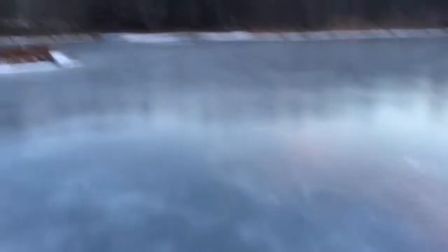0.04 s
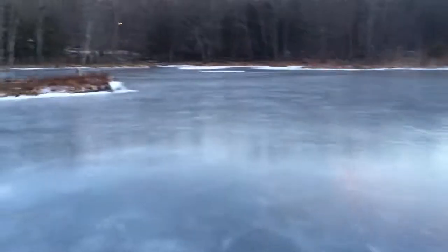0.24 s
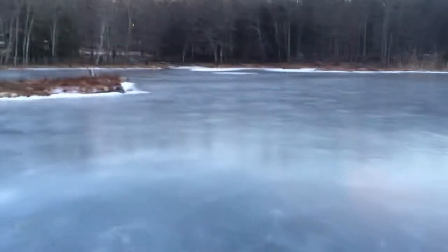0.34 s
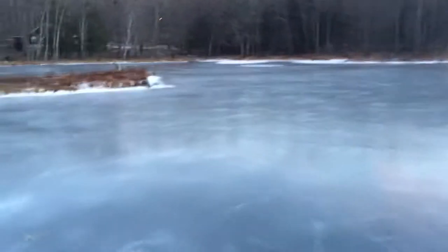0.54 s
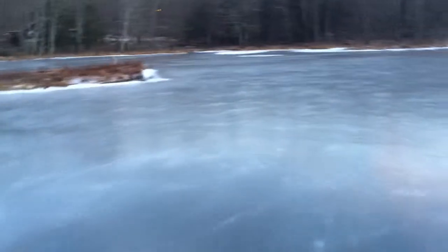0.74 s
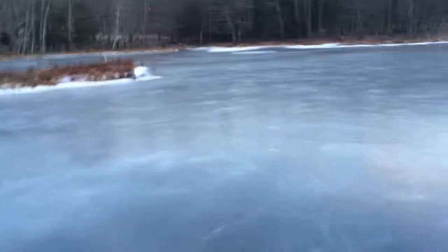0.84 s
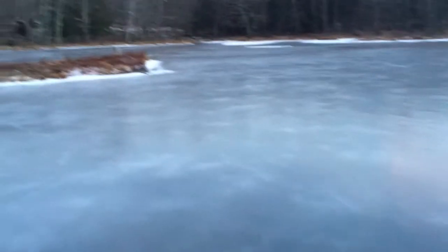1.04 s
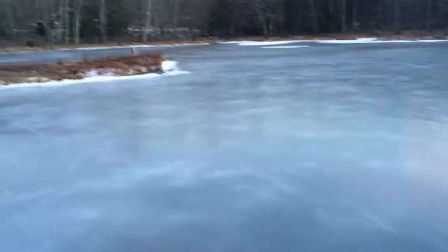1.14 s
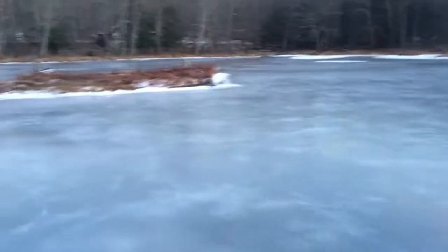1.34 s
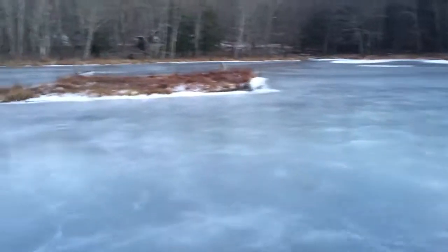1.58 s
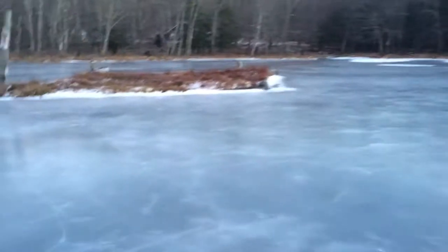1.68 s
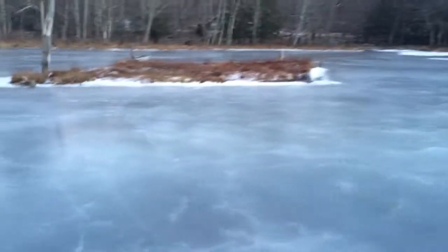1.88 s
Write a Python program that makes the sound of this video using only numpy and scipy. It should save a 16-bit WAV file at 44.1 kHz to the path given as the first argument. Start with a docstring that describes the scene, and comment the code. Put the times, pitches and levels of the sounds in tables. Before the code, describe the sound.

Ice skating on a frozen lake: a sharp crack, a steely blade touch and rasping push-off, then a louder cluster of cracks with a boot thud, then more crunches; close microphone, dry open air, no echo.

```python
"""Ice cracks under a skater on a frozen lake: each fracture is a filtered knock with splinters, ring and snap.
Faint fractures crackle all along. The blade's edge scrapes as crushed grains and hissing ice dust.
The blade sets down with a thin steel ring made of resonant noise, and a push-off rasps.
One step lands with a thud, a low damped knock. Open air, no echo, a faint low rumble of noise."""
import sys
import numpy as np
from scipy import signal
from scipy.fft import rfft, irfft, next_fast_len
from scipy.io import wavfile
from scipy.ndimage import uniform_filter1d, map_coordinates

SR = 44100
rng = np.random.default_rng(int(sys.argv[2]) if len(sys.argv) > 2 else 0)


def dump_mix(stems):
    """Bounce the given channels to the path in sys.argv[1] as a 16-bit WAV at rate SR."""
    frames = np.atleast_2d(stems).T  # one column per channel
    limited = np.clip(frames, -1, 1)  # hard clip at full scale
    pcm = np.round(limited * 32767).astype(np.int16)
    wavfile.write(sys.argv[1], SR, pcm)


N = 83790  # length in samples


def amp(db):
    """Turn decibels into a gain."""
    return 10 ** (np.asarray(db) / 20)


def unit(x):
    """Scale to an average (rms) level of 1."""
    return x / np.sqrt(np.mean(x ** 2) + 1e-20)


def gain(points, hz):
    """Gain at each frequency, from (Hz, dB) points joined on a log axis."""
    point_hz, point_db = np.transpose(points)
    return amp(np.interp(np.log(hz + 1), np.log(point_hz + 1), point_db))


def noise(points, size):
    """Noise of rms 1, coloured by (Hz, dB) points."""
    spectrum = rfft(rng.standard_normal(size))
    return unit(irfft(spectrum * gain(points, np.fft.rfftfreq(size, 1 / SR)), size))


def knock(points, shape=lambda hz: 1, size=4096):
    """A knock of peak 1 coloured by the points times shape(Hz), its energy as early as possible."""
    hz = np.fft.rfftfreq(size, 1 / SR)
    # Folding the cepstrum (the transform of the log spectrum) gives minimum phase
    cepstrum = irfft(np.log(gain(points, hz) * shape(hz)))
    cepstrum[1:size // 2] *= 2
    cepstrum[size // 2 + 1:] = 0
    response = irfft(np.exp(rfft(cepstrum)))
    return response / np.abs(response).max()


def fade(t, t60):
    """Exponential decay that loses 60 dB in t60 seconds."""
    return np.exp(-np.log(1000) * t / t60)


def wobble(rate):
    """A smooth random curve through `rate` random values a second."""
    return map_coordinates(rng.standard_normal(8192), [np.arange(N) * rate / SR], mode="wrap")


def add(track, s, sound):
    """Mix a sound into the track at s seconds."""
    part = track[max(0, round(s * SR)):][:len(sound)]
    part += sound[:len(part)]


def air():
    """Low rumble of moving air and gliding skates: dark noise with an uneven level."""
    # Colour of the rumble. Each row: frequency in Hz, level in dB.
    rumble_colour = [(20, -56), (35, -8.5), (60, -3), (110, -4), (170, 0), (300, -12), (700, -12),
                     (3000, -37), (15000, -60)]
    # Loudness of the rumble over time. Each row: time in seconds, level in dB.
    rumble_level = [(0, -59), (.2, -58.5), (.32, -57), (.6, -60.5), (.93, -51), (1.2, -66), (1.55, -57.5),
                    (1.8, -56.5)]
    level_db = np.interp(np.arange(N) / SR, *np.transpose(rumble_level))
    uneven = amp(5.1 * wobble(25.16))
    return amp(level_db) * unit(noise(rumble_colour, size=N) * uneven)


def chatter():
    """Envelope of rms 1: the edge catches suddenly on each bump and lets go."""
    catches_per_s, spread_db = 100, 3.5
    rise_s, t60_s = .002, 0.024
    smooth_share = .45  # steady part added to the catches
    when, strength = rng.standard_normal(size=(2000, 2))[:int(catches_per_s * N / SR)].T
    at = ((np.arange(len(when)) + when / 2) / catches_per_s * SR).astype(int) % N
    catches = np.bincount(at, amp(spread_db * np.clip(strength, -2, 2)), N)
    t = np.arange(SR // 10) / SR
    one_catch = np.minimum(t / rise_s, 1) * fade(t, t60_s)
    return unit(smooth_share + unit(signal.fftconvolve(catches, one_catch)[:N]))


def crunch(points, force):
    """Dense tiny grains crushed under a given force, their colour shifting with the ice; rms 1."""
    grains_per_s, spread_db, patchy_db = 1500, -2, 3.5
    present = rng.random(N) < grains_per_s / SR
    sign = np.sign(rng.standard_normal(N))
    grains = present * sign * amp(spread_db * np.clip(rng.standard_normal(N), -2, 2))
    crushed = signal.fftconvolve(grains * force, knock(points))[:N]
    # Random patches of the spectrogram get louder or softer
    spectrogram = signal.stft(crushed, nperseg=1024)[2]
    patches = uniform_filter1d(rng.standard_normal(spectrogram.shape), size=3, axis=0)
    return unit(signal.istft(spectrogram * amp(patchy_db * unit(patches)), nperseg=1024)[1][:N])


def scrape():
    """The edge crushes grains and sprays ice dust; both follow the bumps in the surface."""
    # Loudness of the glide and scrape. Each row: time in seconds, level in dB.
    scrape_level = [(0, -37.5), (0.031, -41.5), (.07, -49), (0.094, -44), (.125, -58), (.2, -50),
                    (.284, -57), (.296, -47), (0.332, -38.5), (.365, -50), (.41, -48), (.56, -46),
                    (0.621, -45), (.68, -54.5), (.72, -51.5), (.79, -42.5), (.86, -40.5), (.9, -43.5),
                    (.96, -49.5), (1.01, -48), (1.05, -48.5), (1.22, -48), (1.28, -39.5), (1.362, -35.5),
                    (1.44, -50), (1.49, -42.5), (1.524, -55.5), (1.57, -44), (1.64, -42.5), (1.72, -59),
                    (1.81, -49), (1.9, -49)]
    # Colour of the crushed grains. Each row: frequency in Hz, level in dB.
    grain_colour = [(40, -17.5), (110, -5.5), (190, -1.5), (350, -4), (680, -10), (980, -2), (1350, -1),
                    (1750, 0.5), (2250, -4.5), (2800, -6), (3500, -15), (6000, -21), (15000, -27.5)]
    # Colour of the hissing dust. Each row: frequency in Hz, level in dB.
    hiss_colour = [(1500, -23), (3500, -9), (4400, 6.5), (5400, -2), (6500, -0.5), (9000, -1.5),
                   (15000, -5)]
    crunch_db = -0.5  # relative to the scrape level
    glide_db, hiss_db = -43.5, -56  # the hiss has hiss_db when the scrape level is glide_db
    hiss_grows = 0.43  # dB of hiss for each dB of scrape
    flutter_db, flutter_per_s = 1, 600

    level_db = np.interp(np.arange(N) / SR, *np.transpose(scrape_level))
    bumps = chatter()
    dust = unit(noise(hiss_colour, size=N) * bumps * amp(flutter_db * wobble(flutter_per_s)))
    grains = crunch(grain_colour, np.sqrt(bumps))
    dust_gain = amp(hiss_db + hiss_grows * (level_db - glide_db))
    return amp(level_db + crunch_db) * grains + dust_gain * dust


def push_off():
    """A rasp as the skater leans on the edge and shaves the ice: it rises, holds and fades."""
    # Colour of the shaved ice. Each row: frequency in Hz, level in dB.
    shave_colour = [(60, -38), (170, -7.5), (380, -3.5), (700, -16.5), (1050, -6.5), (1450, 3),
                    (2100, -6.5), (3000, -19.5), (6000, -22.5), (15000, -33)]
    start_s, attack_s, hold_s, t60_s = 0.4588, 0.025, 0.061, 0.17
    level_db = -32.5
    t = np.arange(N) / SR - start_s
    force = np.clip(t / attack_s, 0, 1) * fade(np.maximum(t - attack_s - hold_s, 0), t60_s)
    return amp(level_db) * force * crunch(shave_colour, 1)


def blade():
    """Friction noise sounds the steel's resonances as the blade sets down."""
    # Touches of the blade. Each row: start in seconds, level in dB, attack in seconds,
    # time to fade by 60 dB in seconds.
    touches = [(0.2902, -40.5, 0.00053, 0.067), (0.31, -36.5, 0.016, 0.19)]
    # Resonances of the steel. Each row: frequency in Hz, width in Hz, relative level in dB.
    steel = [(1650, 360, 10), (2220, 170, 7), (3820, 250, 3.5), (6300, 140, 2), (7000, 400, -15.5)]
    f = np.fft.rfftfreq(N, 1 / SR)
    body = 0
    for k, (hz, width, db) in enumerate(steel):
        resonance = 1j * f * width / (hz * hz - f * f + 1j * f * width)
        body = body + (-1) ** k * amp(db) * resonance  # neighbours have opposite sign
    contact = np.zeros(N)
    t = np.arange(SR // 2) / SR
    for s, db, attack, t60 in touches:
        add(contact, s, amp(db) * np.minimum(t / attack, 1) * fade(np.maximum(t - attack, 0), t60))
    return contact * unit(irfft(rfft(rng.standard_normal(N)) * body, N))


def thud():
    """The boot lands with a soft, low push that the foot damps at once."""
    # Colour of the landing: the boot's knock plus the blade's steel ring near 2330 Hz. Each row: frequency in
    # Hz, level in dB.
    landing = [(40, -8), (100, -41), (165, 11.5), (260, 1), (440, -4.5), (640, -20.5), (1000, 1), (1900, -16),
               (2330, 13.5), (2800, -41), (15000, -54)]
    start_s, peak_db = .8388, -11
    contact_s, damp_s = 0.0021, .003  # longer contact is duller; damping sets in at damp_s
    low_hz = 125  # bass below this is weakened
    out = np.zeros(N)
    push = signal.lfilter([1], [1, -np.exp(-2 * np.pi / (contact_s * SR))], knock(landing))
    push = push / (1 + (np.arange(len(push)) / SR / damp_s) ** 3)
    push = signal.sosfilt(signal.butter(2, low_hz, "highpass", fs=SR, output="sos"), push)
    add(out, start_s, amp(peak_db) * push / np.abs(push).max())
    return out


def crack(dull_hz, bass_db, treble_db, bass_hz=600):
    """One fracture: a sharp knock, a few splinters, a short diffuse ring and a brittle snap."""
    # How the ice answers a fracture. Each row: frequency in Hz, level in dB.
    ice = [(40, -50), (100, -32.5), (180, -16), (290, -8.5), (500, -8.5), (700, -8), (950, 0.5), (1150, 0),
           (1400, -1), (1800, -2), (2150, -8.5), (2750, -2.5), (3100, -6), (3600, -14), (6500, -12),
           (9000, -22.5), (15000, -25)]
    # Colour of the brittle snap. Each row: frequency in Hz, level in dB.
    snap_colour = [(1500, 0), (3500, 5), (4500, 2.5), (5400, -7.5), (6400, 4), (8000, -3.5), (15000, -9.5)]
    dull_slope, dull_floor_db = 4.26, -19  # how a slow fracture loses its treble
    splinter_db, splinter_s = -13, .002  # loudest and latest possible splinter
    ring_db, ring_t60_s, rise_s = -7.5, 0.023, 0.00066
    snap_db, snap_t60_s = -25.5, 0.02  # snap level before treble_db is added

    def colour(hz):
        """Weaken the treble above dull_hz and change the bass below bass_hz."""
        dull = amp(dull_floor_db) + 1 / np.sqrt(1 + (hz / dull_hz) ** (2 * dull_slope))
        return dull * amp(bass_db / (1 + (hz / bass_hz) ** 4))

    first = knock(ice, colour)
    t = np.arange(len(first)) / SR
    rise = 1 - np.exp(-t / rise_s)
    out = first.copy()
    for when, strength in rng.random(size=(3, 2)):
        add(out, splinter_s * when, amp(splinter_db) * (2 * strength - 1) * first)
    # The ring scatters through the ice
    scatter = rng.standard_normal(len(t)) * fade(t, ring_t60_s) * rise
    out += amp(ring_db) * signal.fftconvolve(first, scatter / np.linalg.norm(scatter))[:len(t)]
    snap = noise(snap_colour, size=len(t)) * fade(t, snap_t60_s) * rise
    return out + amp(snap_db + treble_db) * snap


def crackle():
    """Faint fractures all along, one at a random moment in each short slot of time."""
    ticks_per_s, tick_db, spread_db = 30, -38.5, 2.5
    dull_hz, treble_db = 2320, 7  # dull_hz is the middle value; each tick varies around it
    out = np.zeros(N)
    for k in range(int(ticks_per_s * N / SR)):
        s = (k + rng.random()) / ticks_per_s
        db = tick_db + spread_db * rng.uniform(-0.92, 1)
        speed = np.exp(rng.normal(0, 0.46))  # a faster fracture is brighter
        add(out, s, amp(db) * crack(dull_hz * speed, 0, treble_db))
    return out


def cracks():
    """The ice gives way under the loaded blade, one fracture after another."""
    # Cracks in the ice. Each row: start in seconds, level of the first knock's peak in dB,
    # frequency in Hz above which it is dull, bass change in dB, brittle treble change in dB.
    fractures = [(0.1114, -26.5, 2630, -14, 14), (0.1597, -24, 2200, 10, 10),
                 (0.1776, -7.5, 1750, -1.5, -3.5), (0.203, -22.5, 2000, -1, -5),
                 (0.2467, -28.5, 1810, 5, 12), (0.2924, -24, 2480, 6.5, 14), (0.3887, -23, 2000, 7, -1),
                 (.391, -26.5, 2300, 0, -6), (0.4306, -15, 1770, -2.5, -18), (.479, -20.5, 1800, 4, -9),
                 (0.52, -21, 2250, 0, 13), (0.5365, -23, 2200, -10, -6), (0.6295, -28.5, 2060, -14, 5),
                 (0.6622, -27, 3120, -24, 14.5), (0.6909, -22, 2740, -1, 3), (.7063, -30, 2000, 5, -8),
                 (0.7279, -24, 3000, 2, -13), (.7439, -5, 1910, -3, -0.5), (0.7695, -12.5, 2520, 4.5, -6),
                 (0.7826, -12.5, 3440, 4.5, -9), (.795, -19, 2000, 7, -10), (0.8255, -14.5, 2680, -4, -2),
                 (0.8379, -14.5, 4080, -7, 14.5), (0.9068, -25.5, 2520, -19, -2),
                 (1.0007, -22.5, 2950, 2, 0), (1.0064, -26.5, 2400, -7, -1), (1.0239, -30, 2620, -5, 10.5),
                 (1.098, -26.5, 2620, -4, 14), (1.102, -23.5, 2840, -12, -8), (1.1609, -22, 2740, -6, -8),
                 (1.1652, -20.5, 2730, -4.5, 7), (1.187, -22.5, 1600, -5, -2),
                 (1.2532, -17.5, 2250, 2.5, 7), (1.302, -11, 1130, 2.5, -6), (1.34, -15, 1800, 10.5, 9),
                 (1.35, -15.5, 2120, -2, 8), (1.3786, -22, 2600, 7, 5), (1.3958, -10.5, 1760, -2, 4),
                 (1.42, -28, 1800, 6, 13), (1.4767, -11.5, 2820, -1, -0.5), (1.483, -26, 2190, -2, -14),
                 (1.561, -25.5, 3100, -2, 10.5), (1.5742, -27.5, 3040, 6, 14), (1.6439, -23, 1710, 2, 6),
                 (1.673, -28, 1540, 2, 10), (1.727, -34.5, 1530, 14.5, 7), (1.7613, -32, 2390, -3, 11.5),
                 (1.7875, -25.5, 2920, -9, 12), (1.8876, -26, 2320, -13, 8)]
    out = np.zeros(N)
    for s, db, dull_hz, bass_db, treble_db in fractures:
        add(out, s, amp(db) * crack(dull_hz, bass_db, treble_db))
    return out


def scene():
    """Add all sources together in one channel."""
    return (air() + scrape() + push_off() + blade() + thud() + crackle() + cracks())[None]


def record(dry):
    """Remove everything from the top frequency upward."""
    top_hz = 15500
    size = next_fast_len(N + SR // 2)
    keep = np.fft.rfftfreq(size, 1 / SR) < top_hz
    return irfft(rfft(dry, size) * keep, size)[..., :N]


dry = scene()
out = record(dry)
dump_mix(out)
```